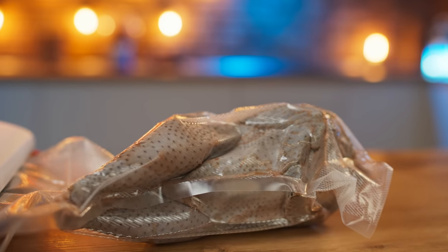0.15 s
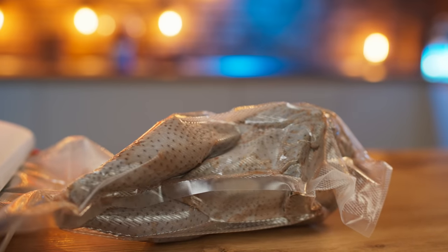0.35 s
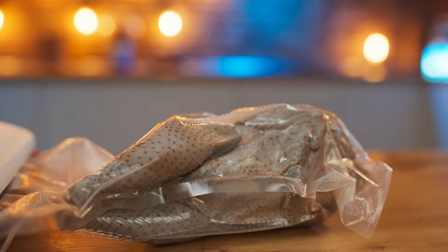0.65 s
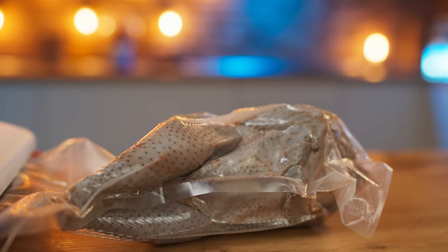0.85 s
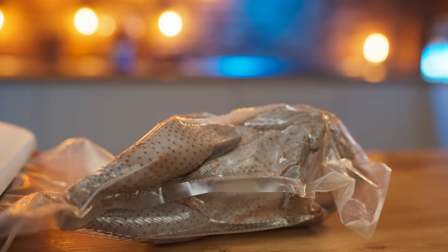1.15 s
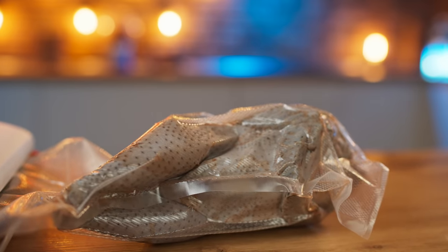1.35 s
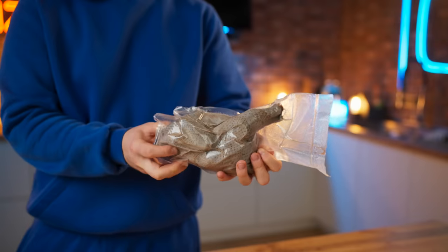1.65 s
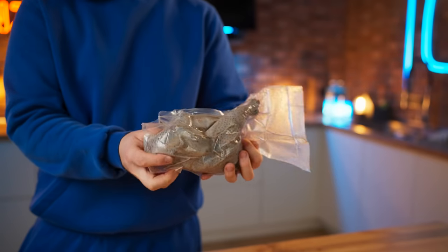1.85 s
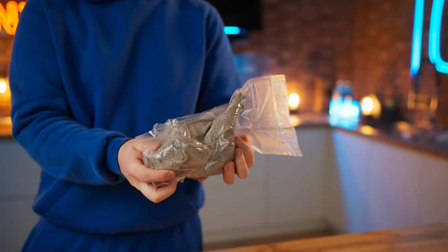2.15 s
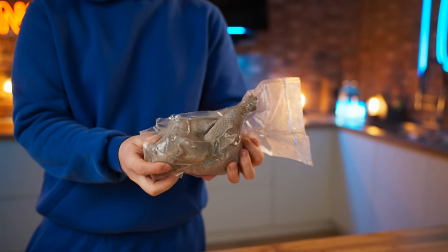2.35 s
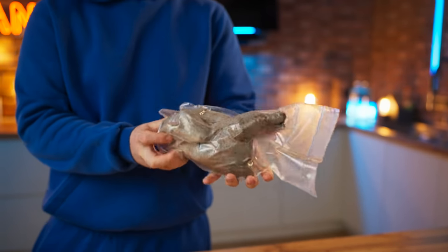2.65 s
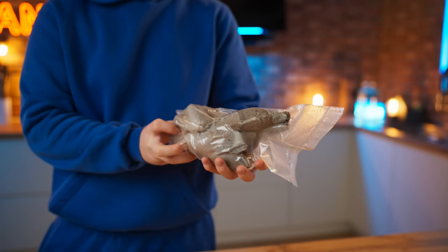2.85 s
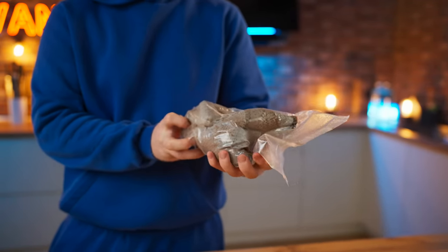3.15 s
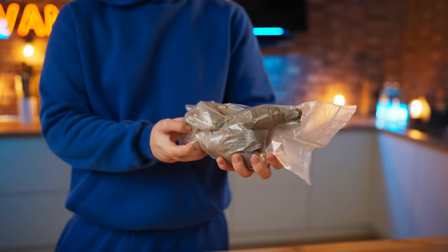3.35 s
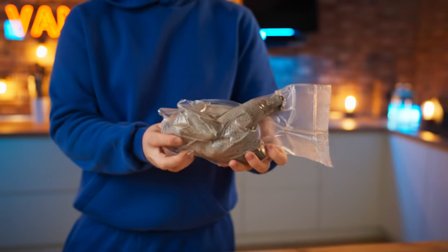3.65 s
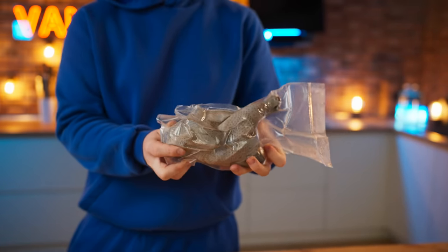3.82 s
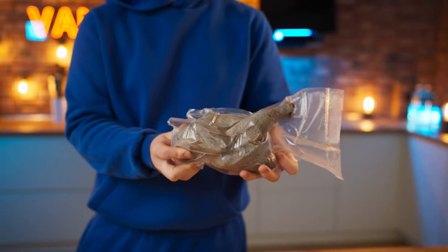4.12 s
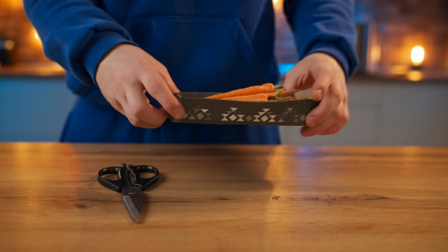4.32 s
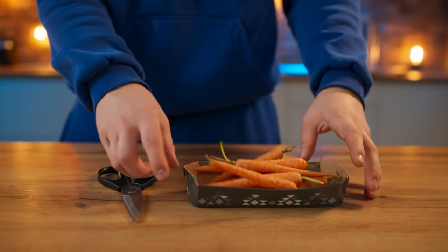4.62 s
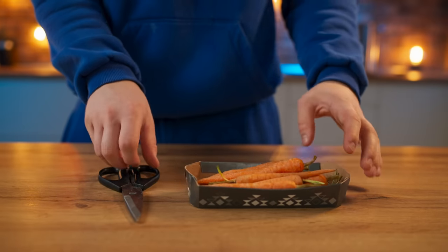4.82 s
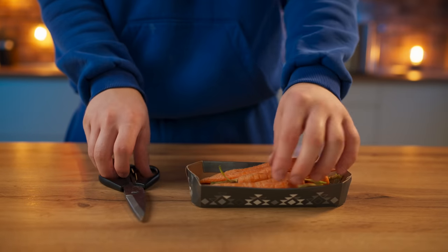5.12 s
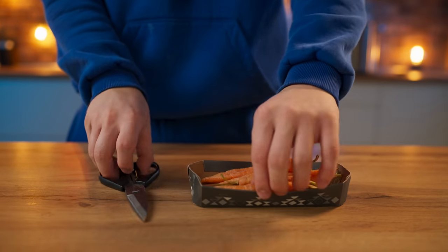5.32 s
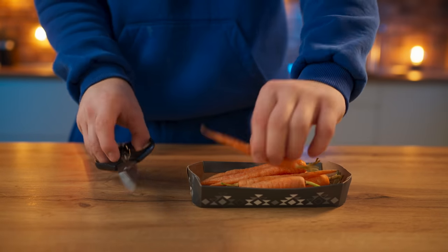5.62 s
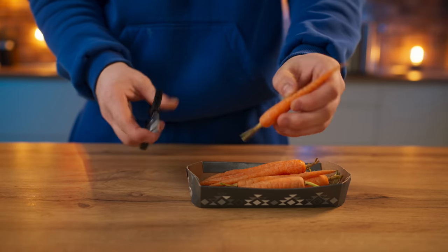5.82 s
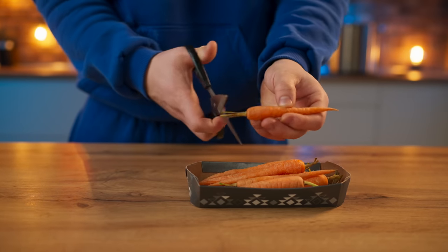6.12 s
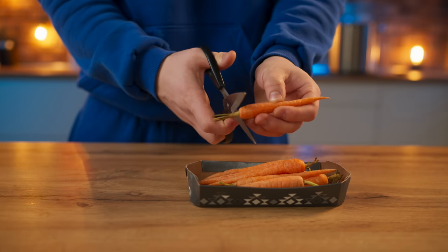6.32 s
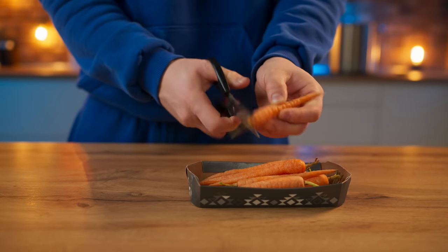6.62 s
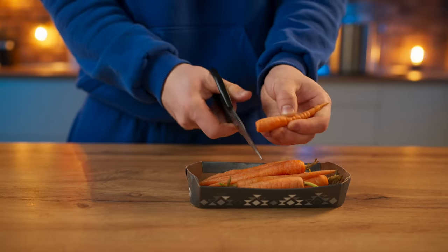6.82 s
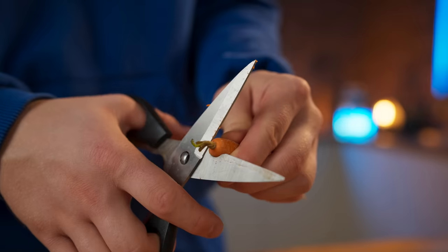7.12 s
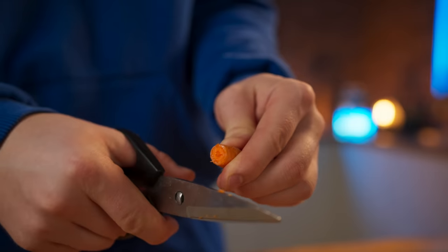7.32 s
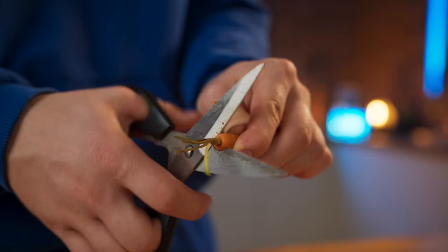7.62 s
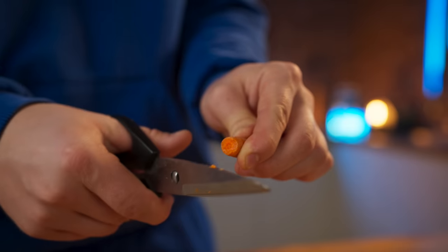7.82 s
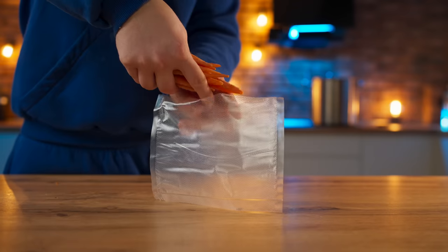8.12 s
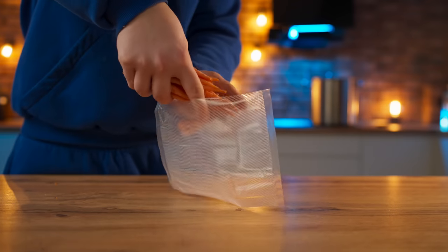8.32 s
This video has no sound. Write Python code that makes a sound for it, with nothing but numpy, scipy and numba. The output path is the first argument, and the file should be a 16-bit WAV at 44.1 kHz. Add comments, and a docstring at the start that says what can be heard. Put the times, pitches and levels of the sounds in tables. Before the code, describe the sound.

A small vacuum pump drones and fades, stiff plastic crackles in hands, a tray knocks onto wood, then scissors snip carrot tops three times.

```python
"""A kitchen: a vacuum sealer's piston pump drones close by, then fades out; hands turn a stiff plastic bag,
set a tray on a wooden table, pick up scissors and snip carrot tops three times. A fridge hums throughout.
The pump is shaft multiples, noise partly replayed each turn and hiss; bag, tray and scissors are
noise cracks and slips ringing resonances, echoed by tiled walls. The loudest peaks are flattened.
"""
import sys
import numpy as np
from scipy import signal
from scipy.fft import rfft, irfft
from scipy.io import wavfile
from scipy.ndimage import uniform_filter1d
from numba import njit

SR = 44100
rng = np.random.default_rng(int(sys.argv[2]) if len(sys.argv) > 2 else 0)


def int16_out(signal):
    """Quantize to a 16-bit WAV file."""
    q = np.round(np.clip(np.atleast_2d(signal).T, -1, 1) * 32767)
    wavfile.write(sys.argv[1], SR, q.astype(np.int16))


N = 373527
T = np.arange(N) / SR

# modes of the wooden table top: pitch_hz, relative_db, t60_s
TABLE_MODES = [(125, -11.5, .15), (250, -1, .15), (278, -4, .14), (324, -8, .12), (530, -1.5, .1),
               (685, -4, .06), (1010, -12, .08), (1260, -11, .09), (1435, -11, .09)]


def undb(db):
    """Decibels to gain."""
    return 10 ** (np.asarray(db) / 20)


def unit(x):
    """Scale to rms 1."""
    return x / np.sqrt(np.mean(x ** 2))


def peak(x, db):
    """Scale to a peak in dB."""
    return undb(db) * x / np.abs(x).max()


def band(x, hz, width_hz):
    """Resonance with gain 1 at its centre."""
    return signal.lfilter(*signal.iirpeak(hz, hz / width_hz, fs=SR), x)


def high(x, hz):
    """Steep high-pass."""
    return signal.sosfilt(signal.butter(4, hz, "high", fs=SR, output="sos"), x)


def top(x, hz):
    """Treble above hz that thins out towards the highest octave."""
    return band(high(x, hz), 7500., 7000.)


def body(x, shape):
    """Broad (Hz, width Hz, dB) resonances side by side, signs alternating."""
    return sum((-1) ** k * undb(db) * band(x, hz, width_hz) for k, (hz, width_hz, db) in enumerate(shape))


def colour(points):
    """Noise of rms 1 with a spectrum of (Hz, relative dB) points."""
    hz, db = np.transpose(points)
    log_hz = np.log(np.arange(N // 2 + 1) * SR / N + 1)
    white = rfft(rng.standard_normal(N))
    return unit(irfft(white * undb(np.interp(log_hz, np.log(hz), db)), N))


def walk(rate_hz):
    """Random levels, rate_hz a second, joined by straight slopes; spread near 1."""
    k = int(SR / rate_hz)
    return uniform_filter1d(np.repeat(rng.standard_normal(N // k + 1), k), k)[:N]


def swell(s, rise_s, fall_s):
    """Gain that climbs to 1 at s and sinks after, 20 dB per rise_s and per fall_s."""
    falls = np.where(T < s, (s - T) / rise_s, (T - s) / fall_s)
    return np.exp(-np.log(10) * falls.astype(np.float32))


def add(out, s, x):
    """Mix x into out from time s."""
    i = int(s * SR)
    out[i:i + len(x)] += x[:N - i]


def ring(modes, scatter_db):
    """Response of (Hz, dB, t60 s) modes to one blow at a chance spot, peak 1."""
    hz, db, t60_s = np.transpose(modes)[:, :, None]
    t = T[:SR // 4]
    level_db = db + scatter_db * rng.standard_normal(db.shape) - 60 * t / t60_s
    x = np.sum(undb(level_db) * np.sin(2 * np.pi * hz * t), axis=0)
    return x / np.abs(x).max()


def burst(t60_s):
    """A sharp first contact, then decaying noise, its signs chosen to strike all pitches nearly alike."""
    chance = rng.standard_normal(2000)
    chance[0] = 6
    x = chance * undb(-60 * T[:2000] / t60_s)
    for _ in range(6):
        spectrum = rfft(x)
        x = np.abs(x) * np.sign(irfft(spectrum / np.abs(spectrum)))
    return x


def grains(rate_hz, spread_db):
    """Dense one-sample slips of very uneven size over a little smooth noise."""
    size_db = spread_db * np.minimum(rng.exponential(size=N), 6)
    hits = (rng.random(N) < rate_hz / SR) * undb(size_db)
    return unit(rng.standard_normal(N) * (0.21 + hits))


def fridge():
    """Hum lines that waver in pitch and level, over the coloured noise of the room's air."""
    # pitch_hz, level_db
    hum_lines = [(48.4, -70.5), (102.3, -78), (150.7, -65), (333.8, -79)]
    # time_s, hum_offset_db
    hum_level = [(0, 3), (4.2, 3), (4.3, -.5), (6.9, -1), (7.1, 2), (8.47, 2)]
    # air noise spectrum: pitch_hz, relative_db_per_hz
    air = [(20, -44.5), (40, -21), (55, -11.5), (80, -17), (120, -21.5), (230, -26), (335, -24),
           (440, -26.5), (960, -28.5), (1400, -36.5), (4000, -44.5), (16000, -54)]
    air_db = -70
    hum = 0
    for hz, db in hum_lines:
        level_db = db + np.interp(T, *np.transpose(hum_level)) + 2.5 * walk(6)
        phase = 2 * np.pi * np.cumsum(hz * (1 + .01 * walk(8))) / SR
        hum = hum + undb(level_db) * np.sin(phase)
    return hum + undb(air_db + walk(2.5)) * colour(air)


@njit
def repeat(x, lag, share):
    """Each shaft turn replays most of the last one, lag samples ago."""
    y = x.copy()
    for i in range(int(lag.max()) + 2, len(x)):
        k = int(lag[i])
        y[i] += share * ((1 - lag[i] + k) * y[i - k] + (lag[i] - k) * y[i - k - 1])
    return y


def pump():
    """Pressure strokes as shaft multiples, valve clatter partly repeated each turn in the housing, and air hiss."""
    # shaft_multiple, relative_db
    strokes = [(2, -27.5), (3, -14.5), (4, -14), (5, -7.5), (6, -11), (7, -13.5), (8, -6.5), (9, -4.5),
               (10, -4.5), (11, -10.5), (12, 1.5), (13, -2.5), (14, -9.5), (15, -9), (16, -3.5),
               (17, -13.5), (18, -14), (19, -13.5), (20, -7)]
    # housing resonances: pitch_hz, width_hz, relative_db, strike_share_of_turn, strike_depth_db,
    # grip_db (below the mean before the bag grips, above after)
    housing_modes = [(574, 130, -10, .87, 1, -2), (745, 40, -10.5, .68, 2, 2), (835, 22, -10, .74, 1, -1),
                     (934, 26, -5.5, .65, 2, 3), (988, 40, -2.5, .65, 2, 1), (1065, 110, -2.5, .65, 2, -2),
                     (1125, 50, -8, .65, 2, 3), (1250, 190, -5, .68, 1.5, 1), (1520, 90, -14, .11, 3, 8),
                     (1690, 55, -9.5, .092, 3, -2.5), (1910, 120, -10, .1, 4, 0),
                     (2350, 400, -14.5, .41, .6, 1), (2740, 220, -7.5, .41, .6, 1),
                     (3100, 200, -11.5, .59, .6, 1.5), (3480, 200, -12, .59, .6, 0),
                     (3800, 330, -11, .17, .6, 1), (4300, 500, -15, .17, .6, 0)]
    # hiss spectrum: pitch_hz, relative_db_per_hz
    hiss_spectrum = [(2650, -19), (4500, -5.5), (5060, -9), (6000, -10), (6600, -16), (7900, -21),
                     (9980, -16), (16000, -31)]
    # time_s, hiss_below_pump_db
    hiss_level = [(0, -24), (.7, -22.5), (.83, -28), (1.6, -28.5)]
    # exhaust valve spitting air once a turn: pitch_hz, width_hz, relative_db
    valve_modes = [(6600, 550, 0), (8700, 400, -5), (9800, 1100, -3), (11000, 800, -7)]
    # counter shaking under the pump: pitch_hz, width_hz, relative_db
    counter_modes = [(120, 30, -3), (280, 120, 0)]
    shaft_hz, sag_hz_per_s = 28.05, .55  # the motor slows as the vacuum builds
    pump_db, swell_db_per_s = -24, .4
    fade_start_s, fade_end_s = 1.5, 1.632
    replay_share, steady_share, steady_half_hz = .88, .85, 2400
    grip_s, grip_span_s = .88, .2  # the bag closes on the food and the tone shifts

    run = int(fade_end_s * SR)
    t = T[:run]
    hz = shaft_hz - sag_hz_per_s * t
    turn = 2 * np.pi * np.cumsum(hz) / SR
    fade = np.clip((fade_end_s - t) / (fade_end_s - fade_start_s), 0, 1)
    gain = undb(pump_db + swell_db_per_s * t) * fade

    # multiples stay nearly in step, so the bass thuds once a turn
    stroke = 0
    for k, db in strokes:
        drift = .6 * rng.standard_normal() + .35 * walk(5)[:run]
        tone = np.sin(k * (turn - 2 * np.pi * .74) + drift)
        stroke = stroke + undb(db + 2.2 * walk(5)[:run]) * tone
    rumble = undb(-17 - 4 * t) * unit(body(rng.standard_normal(run), counter_modes))

    lead = 20 * int(SR / hz[0])  # turns already running at the start
    lag = SR / np.concatenate([np.full(lead, hz[0]), hz])
    clatter = unit(repeat(rng.standard_normal(run + lead), lag, replay_share)[lead:])
    fresh = rng.standard_normal(run)
    grip = np.tanh((t - grip_s) / grip_span_s)
    housing = 0
    for k, (f, width_hz, db, share, depth_db, grip_db) in enumerate(housing_modes):
        # a strike once a turn, with fixed halves and thirds; the treble repeats less
        angle = turn - 2 * np.pi * share
        beat = undb(depth_db * np.cos(angle) + 2. * np.cos(2 * angle) + .8 * np.cos(3 * angle))
        steady = steady_share / (1 + (f / steady_half_hz) ** 2)
        blows = (np.sqrt(steady) * clatter + np.sqrt(1 - steady) * fresh) * beat
        level = (-1) ** k * undb(db + grip_db * grip + .6 * walk(2.78)[:run])
        housing = housing + level * band(blows, f, width_hz) / np.sqrt(width_hz)
    housing = band(high(housing, 450.), 1600., 4000.)

    hiss = colour([(1000, -22)] + list(hiss_spectrum))[:run]
    hiss = hiss * (1 + .3 * np.cos(2 * turn)) * undb(np.interp(t, *np.transpose(hiss_level)))
    spit = undb(6.5 * np.cos(turn - 2 * np.pi * .52) + 2.0 * walk(28)[:run])
    valve = undb(-31) * unit(body(spit * rng.standard_normal(run), valve_modes))
    # the bag crinkles as it shrinks onto the food
    shrink = swell(.72, 3., 1.4) * unit(high(grains(120, 2.6), 5500.))
    crinkle = undb(-29.5) * shrink[:run]
    mix = undb(-12) * unit(stroke) + rumble + undb(-0.5) * unit(housing) + hiss + valve + crinkle
    return np.pad(mix * gain, (0, N - run))


# resonances of the bag's film: pitch_hz, width_hz, relative_db
FILM_MODES = [(1050, 1100, -3.5), (2200, 700, -3.5), (3600, 450, -3), (4100, 450, -3)]


def rustle():
    """Each resonance of the film has its own small slips; the table top rings under what slides on it."""
    # hand movements on film, carrots and handles: fullest_s, rise_s and fall_s (per 20 dB),
    # film_db, treble_db, table_rumble_db
    moves = [(1.66, .05, .6, -61, -64, -76), (2.335, .08, .4, -65, -71, -78),
             (2.50, .12, .14, -45, -54, -56), (2.555, .04, .03, -45, -49, -54),
             (2.65, .05, .1, -53, -59, -68), (2.865, .08, .07, -64, -72, -74),
             (3.15, .03, .1, -69, -85, -80), (3.37, .06, .15, -52, -61, -72),
             (3.42, .05, .025, -52, -66, -68), (3.49, .1, .25, -67, -69, -72),
             (3.63, .1, .3, -67, -75, -80), (3.73, .03, .05, -56, -62, -72),
             (3.83, .03, .15, -46, -70, -66), (3.995, .03, .15, -61, -62, -78),
             (4.11, .07, .09, -54, -71, -66), (4.46, .13, .05, -59, -67, -61),
             (4.9, .04, .13, -80, -88, -46), (5.085, .04, .16, -65, -75, -38),
             (5.29, .03, .2, -65, -80, -57), (5.416, .05, .04, -56, -71, -62),
             (5.6, .05, .5, -67, -69, -80), (5.82, .04, .05, -57, -53, -78), (6.0, .1, .5, -73, -76, -80),
             (7.81, .02, .15, -58, -80, -55), (7.97, .05, .08, -70, -88, -60),
             (8.075, .03, .1, -61, -64, -65), (8.145, .03, .15, -49, -58, -54),
             (8.3, .15, .07, -55, -55, -59), (8.45, .15, .2, -61, -69, -74)]
    # film resonances under 3000 Hz: time_s, offset_db
    film_low = [(1.6, 0), (2.4, -2), (2.52, 2), (2.65, -4), (3.4, -1), (3.85, 1), (4.0, -4), (4.12, 1),
                (4.5, 0), (5.3, -7), (8.08, -3), (8.2, 0), (8.33, 6), (8.47, 8)]
    rows = np.array(moves)
    swells = np.array([swell(*row) for row in rows[:, :3]])
    film, treble, rumble = undb(rows[:, 3:]).T @ swells
    low_db = np.interp(T, *np.transpose(film_low))
    sheet = 0
    for hz, width_hz, db in FILM_MODES:
        level_db = db + low_db * (hz < 3000) + 2.5 * walk(25)
        sheet = sheet + undb(level_db) * band(grains(600, 3.5), hz, width_hz)
    slips = grains(1200, 2.5) * undb(2 * walk(40))
    scuffs = grains(150, 3.5)
    wood = unit(signal.fftconvolve(scuffs, ring(TABLE_MODES, 0)[:3000])[:N])
    wood = wood + undb(-4) * unit(band(band(scuffs, 470.0, 900.), 540., 600.))
    out = film * unit(band(high(sheet, 900.), 3000., 4500.))
    out += treble * unit(band(high(slips, 4700.), 6500., 6000.))
    return out + rumble * unit(high(wood, 89.0))


def bag():
    """Each snap is a short crack rung by the film around the crease."""
    # snapping creases: start_s, peak_db, pitch_hz, treble_db (re peak), t60_s
    snaps = [(1.811, -10, 3800, -9, 0.023), (1.841, -4.5, 2110, -10, 0.011),
             (1.861, -10, 2400, -20, 0.0038), (1.904, -21, 1840, -8, 0.017),
             (2.426, -13.5, 3650, -26.5, 0.0076), (2.481, -40, 3760, -12, 0.014),
             (2.506, -29, 2180, -7, 0.021), (2.554, -28, 3920, -20, 0.03), (2.603, -29, 3740, -12, 0.012),
             (2.612, -13.5, 3700, -7, 0.013), (2.943, -35, 550, -30, 0.012), (2.944, -33, 3470, -4, 0.016),
             (3.103, -50, 3500, -5, 0.01), (3.291, -46, 1720, -11.5, 0.01),
             (3.521, -26.5, 3480, -26, 0.0089), (3.694, -26.5, 3800, -8, 0.0063),
             (3.735, -41.5, 1540, -14, 0.016), (3.773, -29.5, 1470, -28, 0.0069),
             (3.803, -24, 3450, -34, 0.024), (3.815, -25, 3540, -28, 0.024),
             (3.911, -18.5, 3300, -10.5, 0.0089), (4.142, -40, 863, -16, 0.012),
             (8.138, -34.5, 2020, -26, 0.017), (8.15, -38, 3500, -20, .015), (8.158, -40, 2600, -15, .015),
             (8.232, -38, 1280, -12, 0.03), (8.26, -37, 2050, -21, 0.025), (8.267, -38, 930, -33, 0.02),
             (8.295, -37, 3010, -18, 0.02), (8.313, -34.5, 2620, -14, 0.02), (8.326, -40, 2450, -25, .03)]
    out = np.zeros(N)
    for s, db, hz, treble_db, t60_s in snaps:
        crack = burst(t60_s)
        crease = band(crack, hz, .4 * hz) + undb(-5.5) * body(crack, FILM_MODES)
        add(out, s, peak(band(crease, 1700.0, 4000.0), db))
        add(out, s, peak(top(crack, 7200.0), db + treble_db))
    return out


def knocks():
    """A rough contact rings the spot it strikes, rattles the tray, clicks, and sets the table top booming."""
    # tray, scissors and offcuts touching wood: start_s, peak_db, pitch_hz, click_db and boom_db (re peak), t60_s
    contacts = [(4.467, -44, 2000, -22, -21, 0.012), (4.525, -25, 1000, -27, -4, 0.036),
                (4.533, -0.5, 1650, -20, -14, 0.009), (4.535, 5, 2120, -14, -11, 0.026),
                (4.542, -3.5, 1100, -20, -30, 0.024), (4.701, -34, 1250, -3, -2, 0.012),
                (4.849, -56, 700, -20, 17, .02), (4.855, -52, 3500, 12, -5, 0.009),
                (4.897, -50, 1500, -20, 14, .02), (4.973, -49, 1700, -22, 5, 0.014),
                (4.986, -52, 3700, -2, -9, .01), (5.033, -41, 3700, -8, 4, 0.025),
                (5.048, -41, 3600, -14, 4, 0.0094), (5.075, -30, 3780, 14, -8, 0.02),
                (5.107, -32, 3600, 5, -8, 0.012), (5.276, -37, 3400, -6, -3, 0.013),
                (5.293, -46, 1400, -6, 2, .02), (5.425, -47, 3150, -6, -14.5, 0.013),
                (5.487, -54, 3000, 0, -12, 0.012), (5.511, -53, 2200, -13, -12, 0.0094),
                (5.914, -42, 2200, 4, -12.5, 0.011), (7.797, -31, 950, -18, -14, 0.035),
                (7.924, -46, 800, -20, 0, 0.02), (7.962, -43, 2000, -28, -6.5, 0.02),
                (8.087, -50, 900, -12, -2, .02)]
    # pitch_hz, width_hz, relative_db
    tray_modes = [(655, 380, -9), (1250, 500, -3), (1600, 300, -1), (2150, 400, -1.5), (2750, 700, -5),
                  (3700, 900, -5), (5200, 1800, -10.5)]
    # things that shudder or drag on the table: fullest_s, rise_s and fall_s (per 20 dB), wood_db, steel_db
    drags = [(4.6, .04, .15, -33.5, -56), (5.3, .025, .3, -56, -66), (5.41, .06, .05, -61, -57),
             (7.815, .02, .2, -53, -80)]
    # pitch_hz, width_hz, relative_db
    drag_wood = [(640, 140, 0), (1240, 70, 0), (1430, 70, -1), (1530, 80, -2)]
    out = np.zeros(N)
    for s, db, hz, click_db, boom_db, t60_s in contacts:
        crack = burst(t60_s)
        tray_db = -3 + .25 * db  # harder blows shake more of the tray
        spot = band(crack, hz, .25 * hz) + undb(tray_db) * body(crack, tray_modes)
        add(out, s, peak(spot, db))
        add(out, s, peak(top(crack, 4000.), db + click_db))
        add(out, s, peak(ring(TABLE_MODES, 3), db + boom_db))
    slips = grains(500, 3.)
    wood = unit(body(slips, drag_wood))
    steel = unit(band(slips, 3300, 200))
    for s, rise_s, fall_s, wood_db, steel_db in drags:
        out += swell(s, rise_s, fall_s) * (undb(wood_db) * wood + undb(steel_db) * steel)
    return out


def scissors():
    """Stalks crunch ever louder as the blades close, fibres part, blades squeak, the stop cracks and rings
    the steel; each jerk of the hands puffs air at the microphone."""
    # handles meeting at the end of a cut: stop_s, peak_db, low_grip_hz, high_grip_hz, crunch_start_s,
    # crunch_db (just before the stop), climb_db_per_s, treble_db (re crunch)
    stops = [(6.6378, 4.5, 2500, 3900, 6.56, -33, 620, -4), (7.1911, 7.5, 2300, 3600, 7.115, -33, 480, 3),
             (7.6745, 8.5, 2110, 3600, 7.58, -34, 400, 1)]
    # the two resonances that move with the grip: width_hz, relative_db
    grip_modes = [(550, -1.5), (700, 2.5)]
    # pitch_hz, width_hz, relative_db
    handle_modes = [(294, 500, -17), (910, 320, -17), (1600, 500, -5), (4700, 1100, -4), (6850, 450, 1),
                    (9200, 1500, -6), (11800, 3500, -10)]
    # pitch_hz, relative_db, t60_s
    blade_modes = [(2120, -2, .05), (3600, -2, .06), (4320, -4, .05), (6600, -6, .05), (6690, 0, .055),
                   (6990, 0, .05), (6840, 0, .06), (9500, -14, .05)]
    # pitch_hz, width_hz, relative_db
    stalk_modes = [(1300, 900, -4), (3600, 1600, 0), (6900, 600, 2)]
    # fibres that part on the way: start_s, peak_db, pitch_hz, treble_db (re peak)
    fibres = [(6.6024, -24, 3600, -14), (6.6283, -20, 3500, -5), (7.1644, -17, 3800, 0),
              (7.1675, -13, 4000, 0), (7.1761, -20, 4500, 0), (7.6332, -27, 3000, -10),
              (7.6435, -18.5, 1200, -1), (7.656, -14, 4200, -3)]
    # blade squeaks: start_s, length_s, start_hz, end_hz, peak_db
    squeaks = [(6.603, .007, 10000, 11000, -28), (7.1752, .0045, 10000, 11600, -8),
               (7.656, .005, 10300, 11300, -13)]
    puff_delay_s = .012

    slips = grains(4000, 3.)
    crunch, bright = unit(body(slips, stalk_modes)), unit(top(slips, 6000.))
    out, puffs = np.zeros(N), np.zeros(N)
    puff = np.sin(2 * np.pi * 55 * T[:4000]) * undb(-600 * T[:4000])
    for s, db, low_hz, high_hz, start_s, crunch_db, climb_db, treble_db in stops:
        onset = (T < s) * np.clip((T - start_s) / .025, 0, 1)
        climb = undb(crunch_db - climb_db * np.abs(s - T))
        out += onset * climb * (crunch + undb(treble_db) * bright)
        grip = [(hz, *row) for hz, row in zip((low_hz, high_hz), grip_modes)]
        handles = sorted(map(tuple, list(handle_modes) + grip))
        add(out, s, peak(body(burst(.016), handles), db))
        add(out, s, peak(ring(blade_modes, 1.7), db - 20.5))
        add(puffs, s + puff_delay_s, undb(db - 40) * puff)
    for s, db, hz, treble_db in fibres:
        crack = burst(.009)
        fibre = band(crack, hz, .6 * hz) + undb(-6) * body(crack, stalk_modes)
        add(out, s, peak(fibre, db))
        add(out, s, peak(top(crack, 6000.), db + treble_db))
        add(puffs, s + puff_delay_s, undb(db - 32) * puff)
    for s, length_s, start_hz, end_hz, db in squeaks:
        hz = np.linspace(start_hz, end_hz, int(length_s * SR))
        tone = np.sin(2 * np.pi * np.cumsum(hz) / SR)
        add(out, s, undb(db) * np.hanning(len(hz)) * tone)
    return out, puffs


def kitchen(x):
    """One early echo off the counter, then noise tails that mostly die faster in the treble; the sound is shared
    in quick rotation among three noise tails, so the reverberation is smooth and even in pitch."""
    # pitch_hz, t60_s, relative_db
    room_bands = [(150, 1, 0), (504, .52, -1), (1500, .35, -6), (3500, .34, -1), (6500, .33, -1),
                  (11000, .12, -8)]
    echo_s, echo_db, rotation_hz = .0100, -1, 170
    t = T[:int(.7 * SR)]
    out = np.zeros(N)
    add(out, echo_s, undb(echo_db) * np.convolve(x, np.hanning(5) / 2)[:N])
    for k in range(3):
        tail = 0
        for hz, t60_s, db in room_bands:
            tail = tail + undb(db - 60 * t / t60_s) * band(rng.standard_normal(len(t)), hz, 1.2 * hz)
        tail = tail * np.clip(t / 0.0052, 0, 1) ** 2
        share = np.sqrt(2) / 3 * (1 + np.cos(2 * np.pi * (rotation_hz * T + k / 3)))
        out += signal.oaconvolve(share * x, tail / np.sqrt(np.sum(tail ** 2)))[:N]
    return out


def scene():
    """All sources, each with its share of the room; the pump's steady sound holds its room already."""
    steel, puffs = scissors()
    film, wood = bag() + rustle(), knocks()
    wet = kitchen(undb(-15.5) * film + undb(-14) * wood + undb(-16.5) * high(steel, 650.))
    return (fridge() + pump() + film + wood + steel + puffs + wet)[None]


def record(dry):
    """The loudest peaks flatten at the ceiling; the top is cut."""
    ceiling, top_hz = .43, 16100
    flat = dry / (1 + np.abs(dry / ceiling) ** 6) ** (1 / 6)
    return signal.sosfiltfilt(signal.ellip(6, .1, 35, top_hz, fs=SR, output="sos"), flat)


dry = scene()
out = record(dry)
int16_out(out)
```